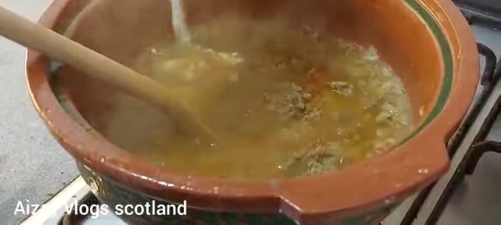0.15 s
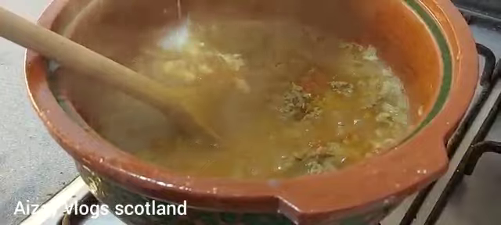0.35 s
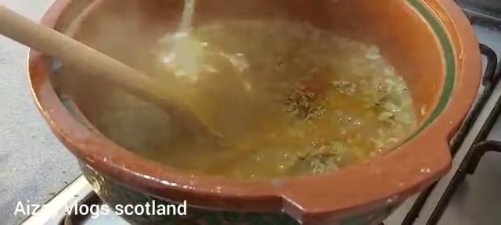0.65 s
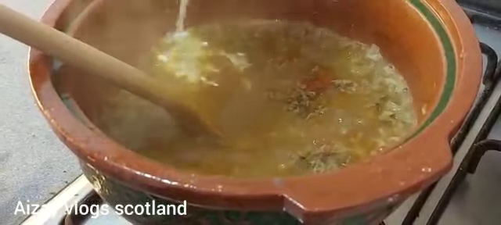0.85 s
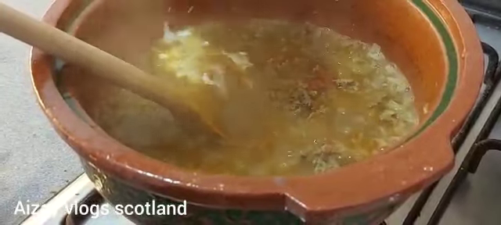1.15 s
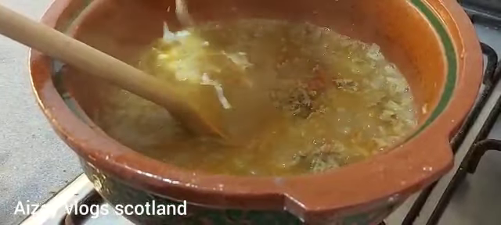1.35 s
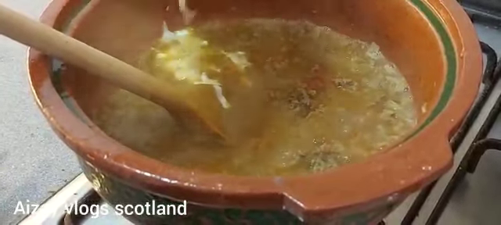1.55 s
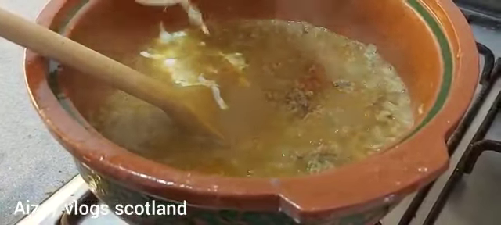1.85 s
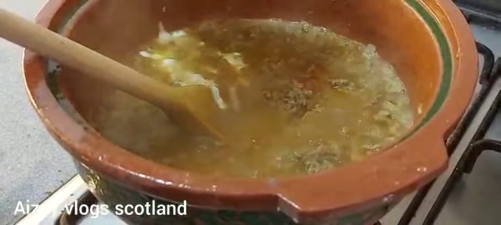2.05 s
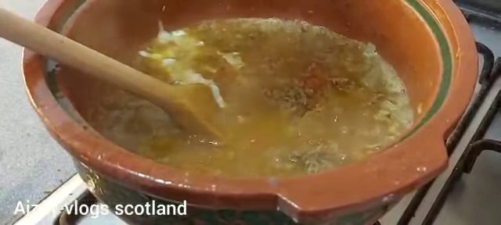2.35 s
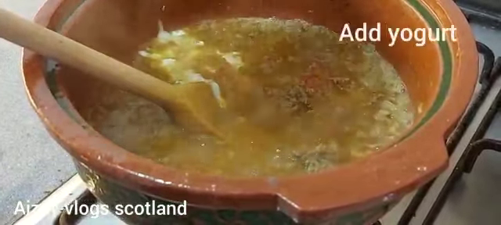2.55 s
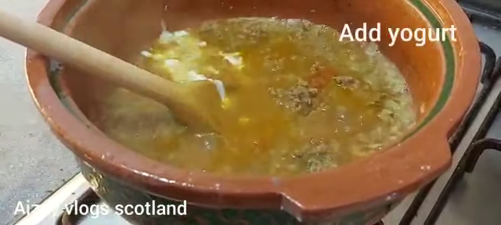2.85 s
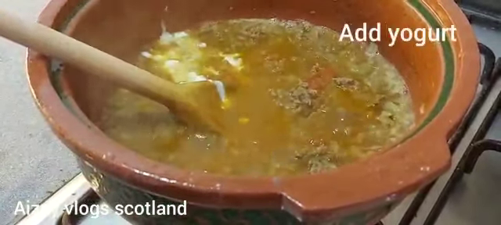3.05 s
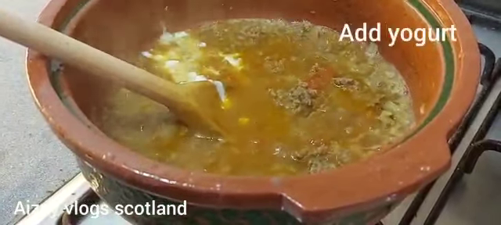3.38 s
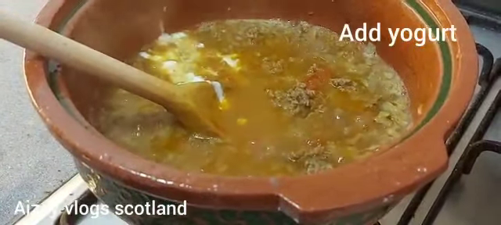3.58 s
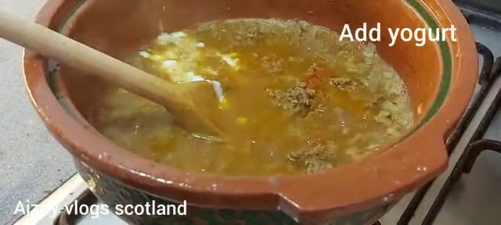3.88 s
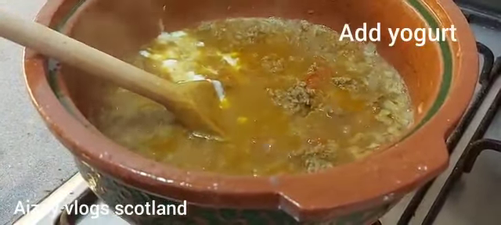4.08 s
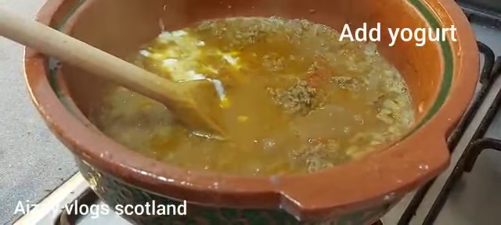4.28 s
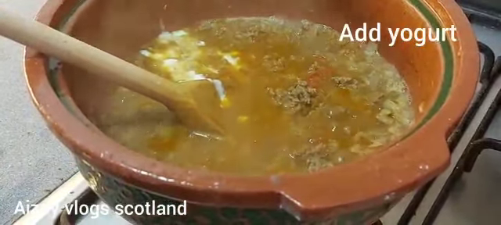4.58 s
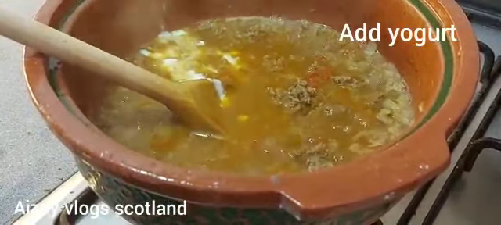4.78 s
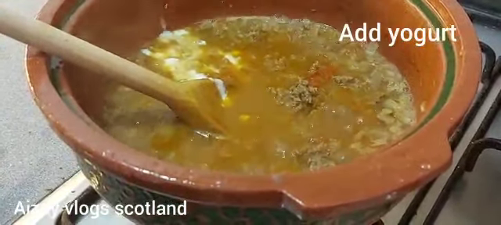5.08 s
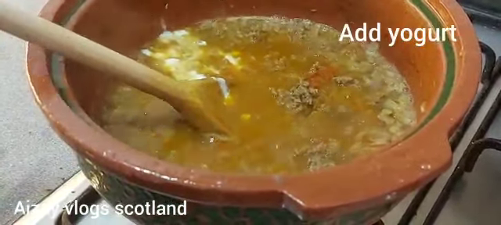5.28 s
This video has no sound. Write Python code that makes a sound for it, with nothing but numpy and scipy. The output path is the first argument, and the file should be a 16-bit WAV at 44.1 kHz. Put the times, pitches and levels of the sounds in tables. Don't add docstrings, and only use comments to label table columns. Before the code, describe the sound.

Constant airy burner hiss and a hollow, pot-coloured simmer, heard close in stereo with a short room echo. Clear bubble pings and clay ticks cluster at the start, a bigger splat comes before two seconds, and crisp spits scatter throughout, denser later. Muffled steps murmur underneath. Two wooden knocks follow near the end, the second much louder, while the boiling carries on.

```python
import sys
import numpy as np
from scipy import signal
from scipy.fft import rfft, irfft, next_fast_len
from scipy.io import wavfile
from scipy.ndimage import uniform_filter1d, map_coordinates

SR = 44100
rng = np.random.default_rng(int(sys.argv[2]) if len(sys.argv) > 2 else 0)


def makeup_ratio(level_db):
    decades = np.asarray(level_db, float) / 20
    return 10 ** decades


def transcribe(u):
    v = np.clip(np.atleast_2d(u).T, -1, 1)
    q = np.round(v * 32767).astype(np.int16)
    wavfile.write(sys.argv[1], SR, q)


N = 239354

# [f/Hz, likeness from -1 to 1]
PORT_LIKENESS = [(60, 0.76), (130, 0.58), (290, 0.67), (640, 0.66), (1410, -0.046), (3100, 0.0099),
                 (15000, -0.087)]
# [t/s, level/dB]
BOIL_LEVEL = [(0, -53), (.35, -54), (.8, -56), (1.3, -53.5), (1.8, -54.5), (2.3, -53.5), (2.55, -55),
              (2.85, -54), (3.6, -55), (4.15, -51.5), (4.55, -54), (5.43, -54)]


def unit(x):
    return x / np.sqrt(np.mean(x ** 2) + 1e-20)


def along(points, hz):
    f, v = np.transpose(points)
    return np.interp(np.log(hz + 1), np.log(f + 1), v)


def curve(rows):
    return np.interp(np.arange(N) / SR, *np.transpose(rows))


def wobble(rate):
    knots = rng.standard_normal(int(N * rate / SR) + 4)
    return map_coordinates(knots, [np.arange(N) * rate / SR])


def filtered(x, response):
    m = next_fast_len(N + SR // 2)
    return irfft(rfft(x, m) * response(np.fft.rfftfreq(m, 1 / SR)), m)[..., :N]


def port_angle(hz):
    return np.arccos(np.clip(along(PORT_LIKENESS, hz), -1, 1))


def spread(pair, gain):
    def mid_side(hz):
        half = port_angle(hz) / 2
        return gain(hz) * [np.cos(half), np.sin(half)]
    mid, side = filtered(pair, mid_side)
    return unit(np.array([mid + side, mid - side]))


def patchy(depth_db):
    z = signal.stft(rng.standard_normal((2, N + 512)), nperseg=512)[2]
    field = uniform_filter1d(rng.standard_normal(z.shape[1:]), size=8, axis=0)
    field = uniform_filter1d(field, size=10, axis=1)
    return signal.istft(z * makeup_ratio(depth_db * unit(field)), nperseg=512)[1][:, :N]


def rings(s, db, hz, t60, rise, size):
    t = np.arange(size) / SR
    s, db, hz, t60 = (np.asarray(v)[:, None] for v in (s, db, hz, t60))
    chirp = np.sin(2 * np.pi * hz * t * (1 + rise * np.minimum(t / t60, 1)))
    wave = makeup_ratio(db - 60 * t / t60) * chirp
    wave = wave * np.minimum(1, 4 * (1 - np.arange(size) / size))
    at = np.round(s * SR).astype(int) + np.arange(size)
    return np.bincount(at.ravel(), wave.ravel(), N + size)[:N]


def grains(count, hz, octaves, cycles, scatter_db, size):
    u = rng.random((2, count, 2))
    pitch = np.clip(hz * 2 ** (octaves * rng.standard_normal((2, count))), 100, 16000)
    times = u[..., 0] * N / SR
    level_db = -scatter_db * np.log(u[..., 1] + 0.018)
    return unit(np.array([rings(times[k], level_db[k], pitch[k], cycles / pitch[k], 0.055, size=size)
                          for k in (0, 1)]))


def pops(events, t60, gain_db, noisy_db, width, snap_db):
    out, t = np.zeros((2, N + 4096)), np.arange(4096) / SR
    f = np.fft.rfftfreq(4096, 1 / SR)
    for s, db, hz, pan_db in events:
        band = 1 / (1 + ((f - hz) / (width * hz)) ** 4)
        splash = unit(irfft(rfft(rng.standard_normal((2, 4096))) * band)) * makeup_ratio(noisy_db - 40 * t / t60)
        ring = np.sin(2 * np.pi * hz * t * (1 + 3 * t)) * makeup_ratio(-60 * t / t60)
        snap = unit(irfft(rfft(rng.standard_normal(4096)) * np.sqrt(band)))
        snap = snap * makeup_ratio(snap_db - 60 * t / 0.00086)
        burst = (ring + splash + snap) * (1 - np.exp(-t / 0.00028))
        sides = makeup_ratio([[pan_db / 2], [-pan_db / 2]])
        out[:, round(s * SR):][:, :4096] += makeup_ratio(db + gain_db) * burst * sides
    return out[:, :N]


def walls(x, level_db):
    # [f/Hz, T60/s]
    wall_decay = [(100, 0.15), (400, 0.43), (800, 0.092), (4000, 0.3), (12000, 0.066)]
    out, step = np.zeros((2, N + 2 * SR)), SR // 3
    for start in range(0, N, step):
        if not x[start:start + step].any():
            continue
        hz, t, z = signal.stft(rng.standard_normal((2, SR // 3)), SR, nperseg=256)
        half = port_angle(hz)[:, None] / 2
        z = z[0] * np.cos(half) + z[1] * np.sin(half) * np.array([1, -1])[:, None, None]
        decay = makeup_ratio(-60 * t / along(wall_decay, hz)[:, None])
        tail = signal.istft(z * decay, SR, nperseg=256)[1]
        wet = signal.fftconvolve(x[None, start:start + step], tail / np.linalg.norm(tail[0]), axes=1)
        out[:, start + 200:start + 200 + wet.shape[1]] += wet
    return makeup_ratio(level_db) * out[:, :N]


def flame():
    # [f/Hz, level/dB per Hz]
    hiss_spectrum = [(1000, -35), (1700, -6), (1960, -2.5), (2870, -9.5), (3490, -5), (3830, -5),
                     (4200, -1), (4920, -5), (5400, -2.5), (8220, -6.5), (9820, 0), (11900, 1), (15200, -7),
                     (15800, -1)]
    level_db, rise_db_per_s, follows_boil = -48.5, 0.3266, 0.046
    crackle = makeup_ratio(-10.0) * grains(count=5000, hz=7500, octaves=0.55, cycles=1.8, scatter_db=5.0, size=48)
    jets = patchy(depth_db=.7)
    hiss = spread(jets + crackle, lambda hz: makeup_ratio(along(hiss_spectrum, hz)))
    boil_db = curve(BOIL_LEVEL)
    heat_db = level_db + rise_db_per_s * np.arange(N) / SR + follows_boil * (boil_db - boil_db.mean())
    return makeup_ratio(heat_db + 0.55 * wobble(14)) * hiss


def simmer():
    # [f/Hz, level/dB per Hz]
    broth_spectrum = [(250, -47), (420, -45), (462, -11.5), (496, -8), (576, -5), (702, -9), (763, -10.5),
                      (786, -13.5), (1320, 0), (1655, -3), (1710, -20.5), (2280, -63), (3850, -120)]
    bubbles = makeup_ratio(-15.0) * grains(count=900, hz=1116, octaves=0.498, cycles=16.0, scatter_db=1.5, size=600)
    wash = spread(patchy(depth_db=0.07) + bubbles, lambda hz: makeup_ratio(along(broth_spectrum, hz)))
    return makeup_ratio(curve(BOIL_LEVEL) + 2.0 + 0.85 * wobble(12)) * wash


def singing():
    # [f/Hz, width/Hz, peak level/dB]
    pot_modes = [(578, 28, -10), (747.5, 23, 0.5), (857, 17, -1), (1320, 15, 2), (1570, 22, -6),
                 (1900, 55, -7), (3523, 86, -9), (4151, 48, -1.5), (4284, 21, -2), (1657, 15, -6)]
    f, t, z = signal.stft(rng.standard_normal((2, N + 4096)), SR, nperseg=4096)
    frame_at = np.minimum((t * SR).astype(int), N - 1)
    lines = 0
    for centre, width, db in pot_modes:
        strength = makeup_ratio(2 * (db + 1.5 * wobble(3.5)[frame_at]))
        pitch = centre * (1 + 0.0056 * wobble(3.5)[frame_at])
        lines = lines + strength / (1 + ((f[:, None] - pitch) / (width / 2)) ** 2) ** 2
    tones = signal.istft(z * np.sqrt(lines), SR, nperseg=4096)[1][:, :N]
    return makeup_ratio(-59.0) * spread(tones, lambda hz: 1 + 0 * hz)


def rumble():
    # [f/Hz, width/Hz, level/dB]
    room_modes = [(78.3, 10, -3), (102, 11.3, 1), (122, 42, -9), (200.6, 6.4, -5.5)]
    # [t/s, level/dB]
    moving = [(0, -56), (.13, -57.5), (.54, -57.5), (.8, -61.5), (1.03, -59), (1.22, -52.5), (1.78, -58),
              (2.07, -59.5), (2.45, -51), (2.77, -60.5), (2.92, -55), (3.31, -58), (4.17, -55),
              (4.34, -44.5), (4.64, -58), (4.79, -50.5), (5.14, -54.5), (5.31, -55)]
    # [f/Hz, level/dB per Hz]
    shuffle_spectrum = [(100, -34), (170, -11), (199, -6), (253, -2.5), (286, 5), (317, 3), (420, 0),
                        (550, -26), (920, -120)]
    # [t/s, peak level/dB, f/Hz, T60/s]
    steps = [(0.163, -44, 102, 0.75), (0.991, -43, 110, 0.3), (1.314, -36.5, 97, 0.11),
             (2.43, -31.5, 91.3, 0.16), (2.478, -26.5, 97, 0.055), (2.83, -38.5, 108.5, 0.17),
             (2.851, -32, 108, 0.11), (2.922, -42, 124, 0.4), (4.25, -32, 105.5, 0.15),
             (4.398, -33, 75.4, 0.14), (4.441, -31.5, 96, 0.12), (5.372, -36, 122, 0.16),
             (5.111, -47, 111, 0.087), (5.132, -43, 116, 0.087)]
    # [t/s, peak level/dB, f/Hz, T60/s]
    heels = [
        (2.051, -51, 202, 0.12),
        (2.296, -46, 205, 0.35),
        (2.334, -46, 296, 0.23),
        (2.43, -39, 234, 0.1),
        (2.801, -43, 283, 0.25),
        (2.921, -47.5, 211, 0.21),
        (5.336, -44.5, 210, 0.23),
        (5.338, -40, 299, 0.22),
    ]
    shuffle_db, shuffle_follows = -63, 0.41

    def murmur_gain(f):
        modes = sum((-1) ** k * makeup_ratio(db) * 1j * f * w / (c * c - f * f + 1j * f * w)
                    for k, (c, w, db) in enumerate(room_modes))
        return (makeup_ratio(-18.5) + abs(modes)) / (1 + (f / 170) ** 4)

    moving_db = curve(moving)
    drive = rng.standard_normal((2, N)) * makeup_ratio(1.2 * wobble(4.47))
    murmur = makeup_ratio(moving_db + 4.0) * spread(drive, murmur_gain)
    scuff = rng.standard_normal((2, N)) * makeup_ratio(1.5 * wobble(18))
    shuffle = spread(scuff, lambda hz: makeup_ratio(along(shuffle_spectrum, hz)))
    shuffle = makeup_ratio(shuffle_db + shuffle_follows * (moving_db - moving_db.mean())) * shuffle
    s, db, hz, t60 = np.transpose(steps + heels)
    thuds = uniform_filter1d(rings(s + 0.0011, db + 2.5, hz, t60, 0, size=9000), size=110)
    return murmur + shuffle + thuds


def boom():
    # [middle t/s, level/dB, half length/s]
    sways = [
        (0.57, -52, 0.17),
        (1.043, -70, 0.1),
        (1.68, -71, 0.097),
        (2.2, -62.5, 0.84),
        (2.85, -63, 0.15),
        (3.06, -47.5, 0.066),
        (3.22, -49, 0.084),
        (3.95, -58, 0.19),
        (4.8, -61, 0.34),
        (5.126, -52, 0.071),
    ]
    rest_db = -64
    t = np.arange(N) / SR
    swell = makeup_ratio(rest_db) + sum(makeup_ratio(db) * np.exp(-((t - s) / half) ** 2) for s, db, half in sways)
    return swell * unit(filtered(rng.standard_normal(N), lambda f: 1 / (1 + ((f - 126) / 7) ** 2)))


def pings():
    # [t/s, peak level/dB, f/Hz, T60/s]
    clear_rings = [(.009, -40, 2500, 0.017), (.0175, -36.5, 813, 0.078), (0.2337, -40, 900, 0.12),
                   (.2572, -33.5, 2260, 0.015), (0.0488, -19.5, 1836, 0.0018), (.048, -32.5, 600, .008),
                   (0.0609, -27, 1310, 0.011), (0.0616, -44, 1200, .004), (.2335, -34, 1080, 0.0097),
                   (.289, -42, 1360, .012), (.3746, -36, 1150, .007), (.612, -42, 1740, .015),
                   (.8, -43, 1400, .02), (1.055, -41, 1140, .015), (1.092, -43, 1400, .012),
                   (1.6418, -36, 1480, 0.025), (1.878, -41, 1300, 0.014), (.264, -40, 2700, .012),
                   (.312, -35.5, 1660, 0.016), (0.3191, -36, 1590, 0.0052), (1.6372, -34.5, 814, 0.064),
                   (1.638, -29, 1446, 0.033), (1.6385, -43.5, 603.7, 0.079), (1.656, -44, 1500, 0.026),
                   (3.7504, -34, 4660, 0.0088), (2.358, -42.5, 2700, 0.024), (2.3603, -37, 4770, 0.021),
                   (4.9668, -32, 1300, 0.02), (.917, -44, 1500, .03), (5.1045, -41, 1880, 0.027)]
    return rings(*np.transpose(clear_rings), rise=0.076, size=3000)


def bursts():
    # [t/s, peak level/dB, f/Hz, left-right level/dB]
    big_bubbles = [(.016, -39.5, 880, -5), (.173, -43.5, 1270, 4), (1.18, -42.5, 1350, 5),
                   (1.87, -40, 1280, 3), (.715, -44, 1370, 2.5), (.793, -45.5, 600, 1),
                   (1.055, -41.5, 1240, 4), (1.092, -46, 1320, -5), (1.373, -38.5, 1235, 3),
                   (1.518, -38, 1300, 3), (1.637, -33.5, 920, 6), (1.828, -41.5, 1340, -1),
                   (2.148, -42, 1560, 4), (2.431, -42.5, 1290, -10), (2.689, -43, 1340, -10),
                   (2.759, -44.5, 1290, 1), (3.556, -43, 1790, 10), (3.822, -44, 1350, -6),
                   (3.846, -45.5, 1170, 12), (3.88, -42, 1450, 5), (4.906, -41.5, 1350, 8),
                   (5.33, -41, 1600, 2), (5.104, -39.5, 1910, -2), (5.306, -44, 1900, 2)]
    return pops(big_bubbles, t60=0.025, gain_db=0.5, noisy_db=-7.5, width=0.76, snap_db=18.0)


def taps():
    # [t/s, peak level/dB, T60/s, brightness/dB per octave]
    touches = [
        (0.0162, -59, 0.04, 0),
        (0.0505, -58, 0.02, 14),
        (.232, -52, 0.065, 4),
        (.317, -43, 0.033, 5),
        (1.6371, -41, 0.071, -12),
        (0.357, -48, 0.03, 4),
        (.374, -44, 0.045, -3),
        (5.115, -51, 0.039, 7),
    ]
    # [f/Hz, level/dB]
    clay_modes = [(538, -19), (868, 1.5), (1430, -1), (2450, -7)]
    s, db, t60, bright_db = np.transpose(touches)
    return sum(rings(s, db + g + bright_db * np.log2(hz / 868), hz + 0 * s, t60 * (868 / hz), 0, size=6000)
               for hz, g in clay_modes)


def snaps():
    # [t/s, peak level/dB, f/Hz, left-right level/dB]
    broad_snaps = [(.0164, -43, 10000, -2), (.0168, -40.5, 1500, -5), (3.562, -44, 5400, 0),
                   (.2259, -48, 4150, 2), (.7941, -53, 5740, -2), (1.3433, -49.5, 4130, -1),
                   (1.6372, -44, 3000, 4), (1.6385, -40, 5200, -3), (.0615, -41.5, 1400, -3),
                   (2.3605, -43.5, 4500, 1), (3.5563, -45, 4200, -4), (3.7515, -41, 7550, 2),
                   (3.9765, -46, 14000, -3), (.9585, -49, 13000, -3), (1.7865, -44, 12000, -3),
                   (4.261, -44, 12000, -3), (4.3101, -46, 12000, -3), (4.6915, -49, 13000, -1),
                   (4.9945, -42.5, 13000, -2), (3.8105, -44, 13000, -4), (4.0105, -54, 6950, -4),
                   (.0495, -40.5, 1900, -2)]
    return pops(broad_snaps, t60=0.016, gain_db=-6.5, noisy_db=10.5, width=1.0, snap_db=4)


def spits():
    # [t/s, peak level/dB, f/Hz, left-right level/dB]
    fat_spits = [(.0174, -38, 3800, 3), (.0562, -39, 4060, -7), (.3331, -35, 12600, 3),
                 (.959, -32.5, 11900, -6), (1.1697, -34.5, 9700, 1), (1.3204, -38, 10000, -6),
                 (1.6369, -31.5, 6920, -12.5), (1.6372, -39, 3670, 0), (1.7863, -33, 9900, -6),
                 (2.1455, -41, 10500, -10), (2.8414, -37, 10100, -2.5), (3.3039, -39, 10800, 2),
                 (3.5565, -42, 6600, 0), (3.7509, -39, 4760, 1), (3.8107, -34.5, 10850, -9),
                 (3.9766, -34, 11000, -8), (4.011, -31, 5880, -4), (4.2428, -35, 12200, -11),
                 (4.2614, -31, 10650, -6), (4.3096, -42, 9910, 8), (4.692, -32, 10800, -3),
                 (4.9501, -35, 11420, -6), (4.995, -26.5, 10000, -9), (5.103, -40, 6880, -8)]
    return pops(fat_spits, t60=0.028, gain_db=-11.5, noisy_db=0.5, width=0.12, snap_db=22.5)


def ticks():
    # [t/s, peak level/dB, f/Hz]
    rim_bubbles = [(0.612, -48, 1900), (.717, -50, 2350), (.884, -46, 2900), (1.512, -46, 2450),
                   (1.6369, -53, 2020), (1.8482, -48, 3080), (2.1535, -44, 1850), (2.322, -48, 1860),
                   (2.5648, -47, 2150), (2.856, -44, 2100), (4.1121, -41, 1940), (4.1557, -40, 2160),
                   (4.574, -46, 1900), (0.196, -46, 1760), (4.675, -44, 2120), (4.9135, -45.5, 1930),
                   (5.103, -37, 2060), (5.3071, -41, 1900), (5.363, -46, 1930)]
    rim_pan_db = 2.5
    events = [(*tick, rim_pan_db) for tick in rim_bubbles]
    return pops(events, t60=0.019, gain_db=-3.0, noisy_db=0.5, width=0.23, snap_db=21)


def plops():
    # [t/s, peak level/dB, f/Hz, left-right level/dB]
    thick_plops = [(0.489, -43.5, 580, 1.0), (0.51, -47, 347, 2.0), (0.696, -53, 585, 1.0),
                   (0.734, -44.5, 625, 5), (1.091, -45.5, 315, 0.5), (1.267, -46, 735, 0.5),
                   (1.309, -45, 301, 0.0), (1.37, -42, 570, -1), (1.456, -44, 580, 1.5),
                   (1.516, -47, 581, 1.5), (1.578, -46, 880, 6), (1.875, -43, 580, -1),
                   (1.999, -40.5, 700, 9), (2.362, -42, 298, -2), (2.5, -44.5, 576, 1.0),
                   (2.612, -49, 584, -3), (2.756, -40.5, 720, 7), (2.799, -45, 380, 5),
                   (3.118, -42.5, 654, 3), (3.203, -50, 840, 8), (3.24, -49, 880, 10),
                   (3.438, -43, 727, 3.0), (3.469, -49, 840, 5), (3.665, -45, 388, 3.5),
                   (3.793, -46, 746, 4), (3.843, -46, 579, 0), (3.878, -53, 538, 3.0),
                   (4.517, -47, 576, 1.5), (5.119, -43, 740, 0.5)]
    return pops(thick_plops, t60=0.045, gain_db=-5.5, noisy_db=-3.5, width=0.67, snap_db=21)


def worktop_modes(t):
    # [f/Hz, level/dB, T60/s, left-right level/dB]
    plate_modes = [(197, -4, 0.21, -5), (250, -11, 0.32, 0), (335.6, -3, 0.69, -1.5), (409, 0.5, 0.14, -5),
                   (444, -3, 0.33, 1), (509, -3, 0.19, 3), (566, 2, 0.18, 2), (626, 2, 0.27, 6),
                   (703, 3.5, .18, 8.5), (756, 5, 0.13, 7), (817, -14, .12, 3), (980, 1, 0.12, 3),
                   (1174, -2, .12, 1), (1450, -4, .06, 0)]
    blur = 0.0003
    beat_depth, beat_hz = 0.54, 22
    first_t60_s, lasting_db = 0.048, -9
    modes = []
    for k, (hz, g, t60, pan_db) in enumerate(plate_modes):
        lead = port_angle(hz) * rng.choice([-.75, .75]) * np.array([[1], [-1]])
        wander = blur * np.cumsum(rng.standard_normal(len(t))) / np.sqrt(SR / 100)
        fade = makeup_ratio(-60 * t / first_t60_s) + makeup_ratio(lasting_db - 60 * t / t60)
        phase = 2 * np.pi * hz * (t + wander) + lead * (1 - np.exp(-t / 0.0036))
        wave = makeup_ratio(g) * fade * np.sin(phase)
        beat = np.cos(2 * np.pi * (beat_hz * (.5 + rng.random()) * t + rng.random((2, 1))))
        wave = wave * (1 + beat_depth * beat)
        sides = makeup_ratio([[pan_db / 2], [-pan_db / 2]])
        modes.append((hz, (-1) ** k * wave * sides * (1 - np.exp(-t / 0.0014))))
    return modes


def rattle(t):
    # [delay/s, level/dB]
    arrivals = [
        (0, 0),
        (.0066, -9),
        (0.014, 5.5),
        (0.031, -16),
        (0.04, -6),
        (.052, -4),
        (.07, -13),
    ]
    out = np.zeros((2, 2 * len(t)))
    for delay, loss_db in arrivals:
        noise = rng.standard_normal((2, len(t)))
        out[:, round(delay * SR):][:, :len(t)] += makeup_ratio(loss_db + 13.5 - 60 * t / 0.098) * noise
    return out


def cupboard(t):
    # [f/Hz, level/dB, T60/s]
    deep_modes = [(78.2, -8.5, 0.28), (123.2, -13.5, 0.23), (160, -34, .06), (118, -2, 0.029)]
    deep = sum((-1) ** (k + 1) * makeup_ratio(g - 60 * t / t60) * np.sin(2 * np.pi * hz * t)
               for k, (hz, g, t60) in enumerate(deep_modes))
    return deep * (1 - np.exp(-t / 0.0034))


def knocks():
    # [t/s, peak level/dB, contact time/s, cupboard swell/dB]
    blows = [
        (4.1541, -32, 0.0014, 14.5),
        (4.6678, -19.5, 0.0017, 10),
    ]
    # [f/Hz, level/dB]
    landing_spots = [
        (600, 1),
        (420, 0.5),
    ]
    # [delay/s, level/dB]
    landings = [
        (0, 2),
        (.0075, -4.5),
        (.0135, -3),
        (.028, -8.5),
        (.052, -6),
    ]
    strike_late_s, strike_db, strike_hz, strike_t60_s = 0.00182, 2, 682, .03
    deep_late_s = 0.0027
    out, t = np.zeros((2, N + SR)), np.arange(SR // 3) / SR
    modes, loose, deep = worktop_modes(t), rattle(t), cupboard(t)

    def add(s, wave):
        out[:, round(s * SR):][:, :len(t)] += wave

    for (s, db, contact, deep_db), (spot_hz, spot_db) in zip(blows, landing_spots):
        touch = np.arange(200) / SR / contact
        force = touch * np.exp(-5 * touch)
        force = force[None] / force.sum()
        panel = sum(makeup_ratio(spot_db * np.exp(-(np.log(hz / spot_hz) / 0.13) ** 2)) * wave for hz, wave in modes)
        ring = signal.fftconvolve(panel, force, axes=1)[:, :len(t)]
        shake = signal.fftconvolve(loose, force, axes=1)[:, :len(t)]
        for delay, loss_db in landings:
            add(s + delay, makeup_ratio(db + loss_db) * ring)
        add(s, makeup_ratio(db - 1.5) * shake)
        clack = -makeup_ratio(db + strike_db - 60 * t / strike_t60_s) * np.sin(2 * np.pi * strike_hz * t)
        add(s + strike_late_s, clack * makeup_ratio([[2], [-2]]))
        add(s + deep_late_s, makeup_ratio(db + deep_db) * deep)
    near = filtered(out[:, :N], lambda f: (1j * f / (1j * f + 65)) ** 2 / (1 + 1j * f / 2500) ** 2)
    return near + walls(near.mean(axis=0), level_db=-10.5)


def scene():
    # [f/Hz, left-right level/dB]
    port_tilt = [(60, -12.5), (130, -0.5), (380, 4), (700, 0), (1290, 1.5), (2380, 3.5), (4400, -1),
                 (15000, -3)]
    steady = flame() + simmer() + singing() + rumble() + boom()
    steady = filtered(steady, lambda hz: makeup_ratio(along(port_tilt, hz) / 2 * [[1], [-1]]))
    clear = pings()
    pot = bursts() + taps() + snaps() + spits() + ticks() + plops()
    room = walls(pot.mean(axis=0) + makeup_ratio(-6) * clear, level_db=-1.5)
    return steady + pot + clear + room + knocks()


def band_limit(x):
    return signal.sosfilt(signal.butter(12, 15830, fs=SR, output="sos"), x)


def record(dry):
    ports_hz, top_hz = 134, 15830
    mid = dry.mean(axis=0)
    side = filtered((dry[0] - dry[1]) / 2, lambda hz: 1 / (1 + (ports_hz / (hz + 1)) ** 4))
    pair = np.array([mid + side, mid - side])
    mix = filtered(pair, lambda hz: (hz < top_hz) * (1j * hz / (1j * hz + 45)) ** 2)
    return band_limit(mix)


dry = scene()
out = record(dry)
transcribe(out)
```